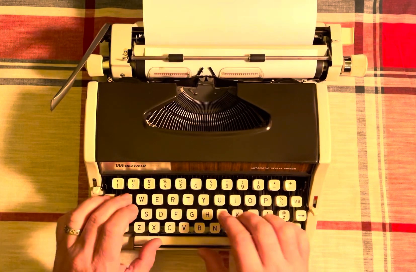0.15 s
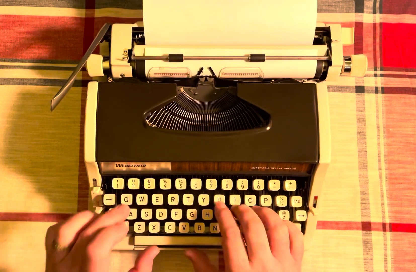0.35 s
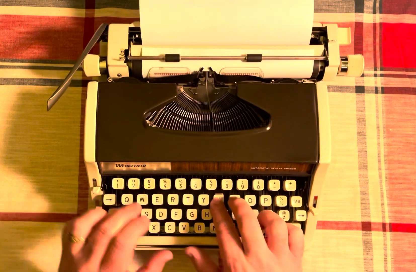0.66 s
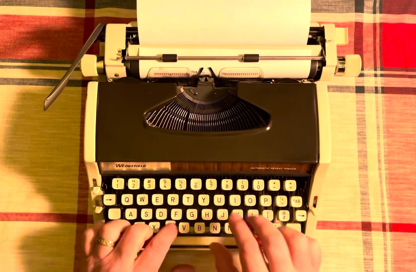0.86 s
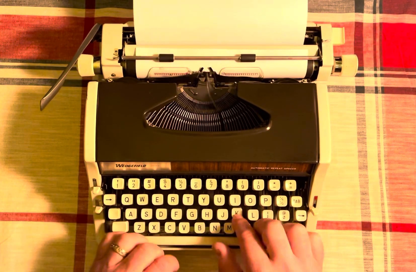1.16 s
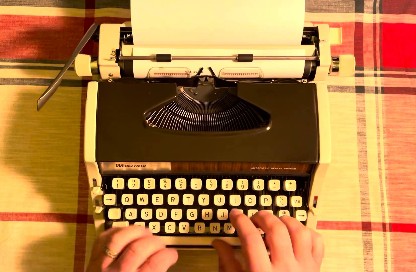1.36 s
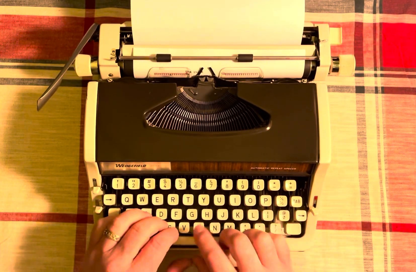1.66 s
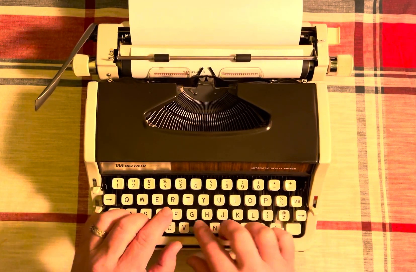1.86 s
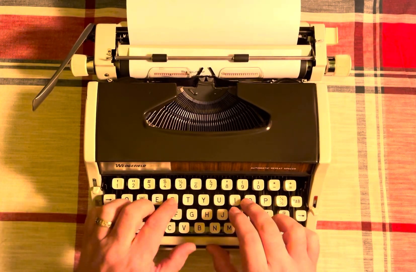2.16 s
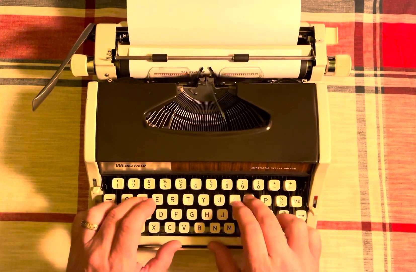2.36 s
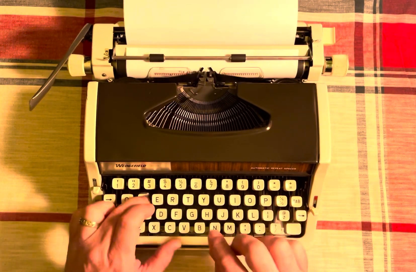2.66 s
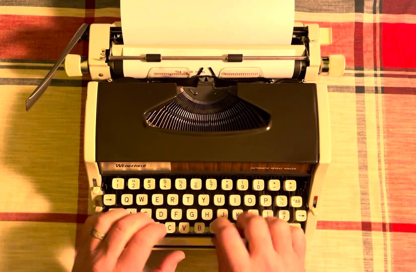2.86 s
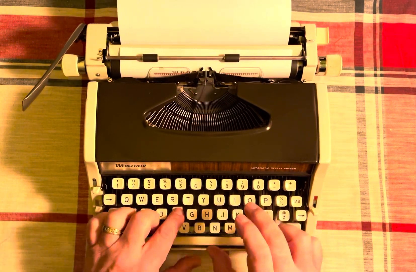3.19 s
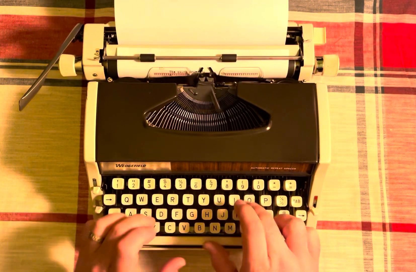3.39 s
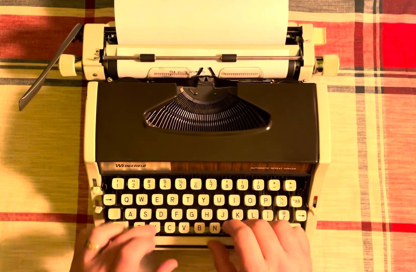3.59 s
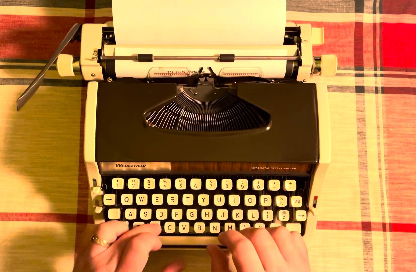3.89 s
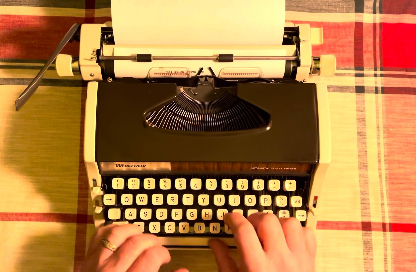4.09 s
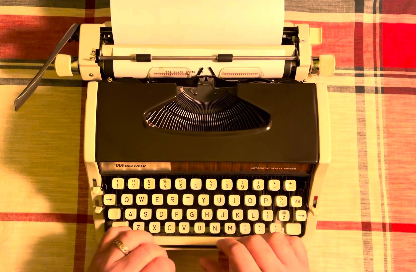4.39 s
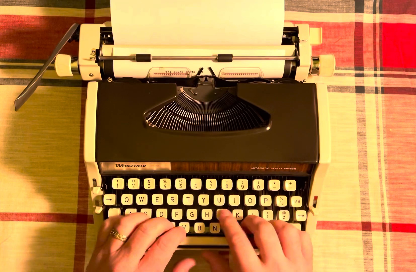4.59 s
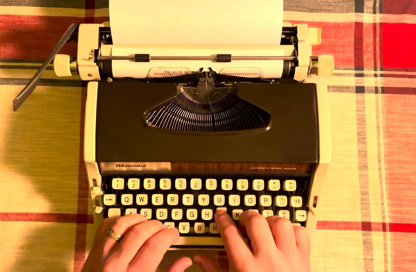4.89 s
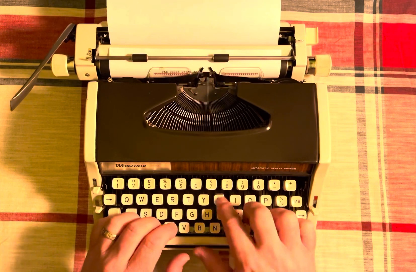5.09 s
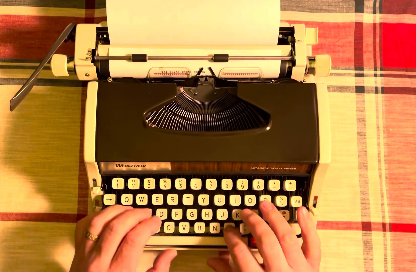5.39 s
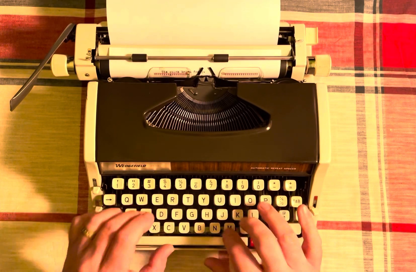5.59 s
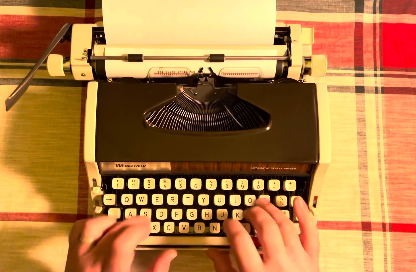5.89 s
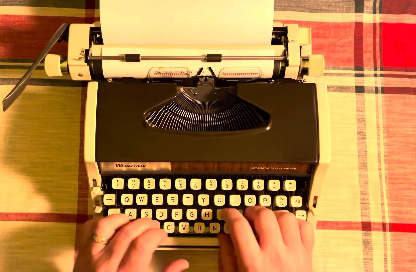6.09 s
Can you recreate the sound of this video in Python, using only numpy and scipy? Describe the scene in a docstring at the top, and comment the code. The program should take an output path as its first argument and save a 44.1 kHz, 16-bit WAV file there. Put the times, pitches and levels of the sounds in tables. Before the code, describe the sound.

A manual portable typewriter clacks in uneven bursts of sharp key strikes with softer space-bar thumps, close up in a small quiet room.

```python
"""On a cloth-covered table in a small room, a portable manual typewriter is heard by two microphone ports just above.
Each letter is a chain of metal contacts: key down, type bar on the platen, escapement step, bar falling back.
The contacts are bursts of rough force that sound directly and ring the damped modes of frame and casing.
Two low table modes sway, sixteen feedback delays form the room, and the margin bell rings faintly once.
The space bar, loose levers and a thin squeak sound in between, above a faint hush and rumble."""
import sys
import numpy as np
from scipy import signal
from scipy.fft import rfft, irfft, next_fast_len
from scipy.io import wavfile
from scipy.ndimage import uniform_filter1d

SR = 44100
rng = np.random.default_rng(int(sys.argv[2]) if len(sys.argv) > 2 else 0)


def transcribe(u):
    """Save the signal u as a 16-bit wav file named by the first command-line argument.

    u: samples, shape (n,) or (channels, n), limited to [-1, 1]; the rate is SR.
    q: integer samples, one column per channel.
    """
    v = np.clip(np.atleast_2d(u).T, -1, 1)
    q = np.round(v * 32767).astype(np.int16)
    wavfile.write(sys.argv[1], SR, q)


N = 275625

# modes of casing, frame and type bars: (frequency [Hz], relative level [dB], t60 [s])
BODY_MODES = [(190, -9.5, 0.053), (463, -10, 0.1), (542.3, -10.5, 0.085), (722.7, -9, 0.056),
              (838, -7.5, 0.056), (875, -9, 0.053), (1117, -11, 0.057), (1182.6, -8.5, 0.054),
              (1295, -8, 0.072), (2190, -10, 0.052), (2312, -10, 0.035), (2509, -5, .025),
              (2610, -6, 0.032), (3230, -6.5, .018), (3430, -8.5, 0.044), (3670, -1.5, 0.021),
              (4130, -9, 0.023), (5390, -9.5, 0.038), (5940, -11, 0.013), (7350, -10.5, 0.019),
              (11600, -7.5, 0.0077)]
# radiation and microphone response: (frequency [Hz], gain [dB])
RADIATION = [(150, -23), (350, -7), (800, 1), (1700, 0.5), (2600, 1), (4500, -1), (7000, 3), (11000, 5),
             (13000, -13), (15000, -27.5), (17000, -55.5)]


def typewriter():
    """Forced vibration: contact force radiates as clatter and excites damped modes, unevenly at each contact."""
    knock, clack, tick = force_envelopes(snap_db=-0.5, snap_s=0.00037, rise_s=[.0012, .0002, .0001])
    crack = np.minimum(clack, amp(-2.5) * np.sqrt(clack * tick))  # upper mids fade along with the tick
    clatter = amp(6.5) * band(clack * grit(1.7), 1747, 3000)
    clatter += amp(8.5) * band(crack * grit(3.1), 3000, 4740)
    clatter += amp(8.0) * band(knock * grit(2.5), 180, 1700)
    clatter += amp(4) * band(tick * grit(2.5), 4700, 21000)

    all_contacts = contacts()
    latest = np.searchsorted(all_contacts[:, 0] * SR, np.arange(N))  # the contact each sample belongs to
    strength = rng.uniform(-0.52, 1, (len(all_contacts) + 1, len(BODY_MODES)))
    shake, rings = grit(3.1), np.zeros(N)
    for k, (hz, level_db, t60) in enumerate(BODY_MODES):
        if hz < 1700:
            force = knock
        elif hz < 3000:
            force = clack
        elif hz < 4700:
            force = crack
        else:
            force = tick
        uneven = amp(3.56 * strength[latest, k])
        own_shake = np.roll(shake, 997 * k)  # shifted so that the modes do not move in step
        rings += ring(force * uneven * own_shake, hz, t60) * amp(level_db - 24)

    s, clack_db, thud_db = np.transpose(STRIKES)[:3]
    weight = amp(27) * lingering(s, clack_db + thud_db, t60=.035, rise_s=0.00045) + amp(-19) * knock
    thud = band(weight * grit(1.6), 70, 350)
    return shaped(clatter + rings, RADIATION, amp) + thud


# levers and springs keep sliding after a contact: (dull part, bright part)
SLIDE_DB, SLIDE_T60_S = (-22, -24), (.3, .2)  # dB re knock and tick
SETTLE_DB, SETTLE_T60_S = -50, 1.1  # the frame rustles on faintly: dB re knock


def force_envelopes(snap_db, snap_s, rise_s):
    """Impact and friction: each contact snaps, then chatters away, while sliding parts fill the gaps, as power."""
    rows = contacts()
    s, clack_db, knock_db, tick_db, t60, push_db = rows.T
    dull = lingering(s, clack_db + knock_db + SLIDE_DB[0], SLIDE_T60_S[0], rise_s=.004)
    dull += lingering(s, clack_db + knock_db + SETTLE_DB, SETTLE_T60_S, rise_s=.004)
    bright = lingering(s, clack_db + tick_db + SLIDE_DB[1], SLIDE_T60_S[1], rise_s=.004)
    # sliding parts catch and slip
    jerks = amp(2.5 * rms_one(uniform_filter1d(rng.standard_normal(N), size=350)))
    power = (jerks * np.array([dull, amp(-9.0) * dull, bright])) ** 2
    for s, clack_db, knock_db, tick_db, t60, push_db in rows:
        start = round(s * SR)
        age = np.arange(min(N - start, SR // 5)) / SR
        # light, bright parts rattle longer
        lasting = np.clip(t60 * amp(0.45 * np.clip(tick_db, 0, 12)), .003, .3)
        # dull, padded contacts build up slower
        padded = amp(0.64 * np.clip(-tick_db, 0, 18))
        rise = 1 - np.exp(-age / (np.abs(rise_s)[:, None] * padded + 1e-5))
        chatter = amp(-60 * age / lasting)
        snap = amp(snap_db) * np.exp(-age / snap_s)
        level = amp(clack_db + np.array([knock_db + 3.0, -4.5, tick_db - 4.5]))
        power[:, start:start + len(age)] += (level[:, None] * rise * (chatter + snap)) ** 2
    return np.sqrt(power)


def contacts():
    """Superposition: all contacts in time order, as rows of
    (time [s], clack [dB], knock [dB re clack], tick [dB re clack], base chatter t60 [s], table push [dB re clack])."""
    rows = key_downs() + strikes() + steps_and_rattles() + falls() + spaces()
    return np.array(sorted(rows))


# a finger drives a letter key down: (time [s], clack level [dB], tick [dB re clack], push on the table [dB],
# time until the lever takes the load [s], lever clack level [dB])
KEY_DOWNS = [(0.5407, -32, 13.5, -47, .0145, -24), (0.613, -32, 6, -60, .01, -45),
             (0.706, -26, 1.5, -54, .0083, -36.5), (0.86, -37, 13.5, -53, .009, -34),
             (1.1031, -29.5, 9.5, -54, .01, -44.5), (1.7575, -35.5, 7.5, -52, .0104, -41.5),
             (2.057, -33, 8.5, -43, .01, -43.5), (2.36, -34, 8.5, -46, .011, -32.5),
             (2.627, -34, 10, -55, .0103, -29.5), (3.153, -34, 10.5, -44.5, .01, -45),
             (3.3259, -32.5, 11, -55, .012, -26.5), (3.8082, -40, 12, -49, .0068, -22),
             (4.8143, -39.5, 9, -43, .0113, -42.5), (5.008, -35.5, 11, -46, .0097, -47),
             (5.602, -36.5, 3, -53, .01, -37.5), (5.806, -50, 15, -56, .01, -55),
             (5.919, -33, 7, -56, .0105, -37)]
# lever: (knock [dB re clack], tick [dB re clack], base chatter t60 [s], push [dB re clack])
KEY_KNOCK_DB, KEY_T60_S, LEVER = -1, .035, (-3, 3, 0, -35)


def key_downs():
    """Load transfer: the key moves first, then its lever takes up the load with a second contact."""
    rows = []
    for s, db, tick_db, push_db, lever_s, lever_db in KEY_DOWNS:
        rows.append((s, db, KEY_KNOCK_DB, tick_db, KEY_T60_S, push_db - db))
        rows.append((s + lever_s, lever_db, *LEVER))
    return rows


# type bar on the platen: (time [s], clack level [dB], low thud [dB re clack],
# graze on the guide just before [dB], rebound [dB])
STRIKES = [(0.5797, -10, -40, -26, -44), (0.6304, -11.5, -45, -29, -30), (0.7312, -11, -43, -34.5, -28.5),
           (0.9038, -11, -41.5, -16.5, -28), (1.1334, -11, -44, -19, -27), (1.7981, -10.5, -42, -18.5, -39),
           (2.0906, -9, -43, -24.5, -30), (2.4, -7.5, -34, -23, -23), (2.6694, -10.5, -44.5, -28, -28),
           (2.7875, -8.5, -42.5, -24.5, -31.5), (3.1878, -7.5, -36.5, -21, -25),
           (3.3591, -9, -46, -18.5, -27), (3.8448, -10, -38, -24, -34.5), (4.85, -9, -43, -23.5, -32),
           (5.0436, -7, -40, -25, -29), (5.6407, -8.5, -42, -21.5, -37), (5.8327, -7.5, -46, -27, -40),
           (5.952, -8.5, -48, -24, -32)]
# each: (knock [dB re clack], tick [dB re clack], base chatter t60 [s], push on the table [dB re clack])
GUIDE, PLATEN, REBOUND = (-7, 2, .025, -45), (-13, 1.3, 0.027, -50), (-7, 7, 0.02, -40)
GUIDE_BEFORE_S, REBOUND_AFTER_S = .0055, .015


def strikes():
    """Impact and rebound: the type bar grazes its guide, hits the platen and springs back."""
    rows = []
    for s, db, thud_db, guide_db, rebound_db in STRIKES:
        rows.append((s - GUIDE_BEFORE_S, guide_db, *GUIDE))
        rows.append((s, db, *PLATEN))
        rows.append((s + REBOUND_AFTER_S, rebound_db, *REBOUND))
    return rows


# escapement lets the carriage step: (time [s], clack level [dB], casing knock [dB re clack], tick [dB re clack])
STEPS = [(0.7769, -25, -6, 1.5), (0.9691, -23, -26, 2.5), (1.2013, -27, -17, 5.5), (1.851, -37, 5, 0.5),
         (2.1402, -28.5, -6.5, 0.5), (2.4526, -32, 0, 3), (2.723, -26.5, -3.5, -3), (2.8555, -33, -5, -1.5),
         (3.2489, -24, -16, -4), (3.4121, -27.5, -12, -0.5), (3.895, -34, 0, 3.5), (4.9104, -31, -1.5, 1),
         (5.0934, -26, -10, -2.5), (5.696, -25.5, -5, -5), (5.866, -13.5, -15, -5.5), (5.996, -22.5, -5, 2)]
# loose levers and fingers brushing keys: (time [s], clack level [dB], casing knock [dB re clack],
# tick [dB re clack])
RATTLES = [(0.184, -41.5, 1, 3.5), (0.2376, -62, 8, 16), (0.2425, -46.5, 3, -0.5), (0.2904, -48.5, 6, -0.5),
           (0.339, -56.5, 5.5, -8), (0.547, -28, -5.5, 5), (0.652, -31, -7, 5), (0.759, -34, -3, 2),
           (1.585, -54.5, 2.5, -1.5), (1.642, -51, 7.5, -4), (1.7743, -40.5, -3, 11.5),
           (2.219, -52.5, 6, 10), (2.347, -48.5, -1, -11), (2.674, -25, -12, -2), (2.6908, -28, -7, 5),
           (2.7037, -30, 1.5, 4.5), (2.968, -45, -11, -1), (3.085, -43.5, 2, -4.5), (3.332, -32.5, -2.5, 6),
           (3.4767, -44.5, 7.5, -6), (3.554, -42, -4.5, 1), (3.822, -31, -3, -3), (3.961, -47.5, 12, -3),
           (4.1264, -47, -6, 2), (4.5387, -57, -13.5, 7), (4.5654, -60.5, 2, 0), (4.6083, -66, 4.5, 4),
           (4.644, -72, 5.5, 9), (4.6798, -55, 6, -6.5), (4.711, -55, 1, -6), (5.161, -50.5, -7, 12.5),
           (5.2563, -53, 12, -9), (5.2922, -47.5, 1.5, -2), (5.3233, -58, -1, 4), (5.332, -49, -6, -4),
           (5.356, -55, 6, -21), (5.3997, -46.5, 0.5, 6.5), (5.4563, -49, -3.5, -3.5),
           (5.4903, -55.5, 4, -21), (5.5359, -64.5, 9, -14), (5.621, -44, 0.5, 12), (5.6716, -38.5, -8, 3),
           (5.7797, -39.5, 0, 10), (5.8575, -33, -15, 6), (5.882, -34, 2, -12), (5.975, -33, -1, 12.5),
           (5.983, -43.5, 4, 22), (6.0631, -33, 4.5, 11.5), (6.2286, -58, -9, 8)]
RATTLE_T60_S, RATTLE_PUSH_DB = .032, -30  # base chatter; push in dB re clack


def steps_and_rattles():
    """Light impact: escapement steps and loose parts share one short chatter time."""
    return [(s, db, knock_db, tick_db, RATTLE_T60_S, RATTLE_PUSH_DB)
            for s, db, knock_db, tick_db in STEPS + RATTLES]


# type bar drops back on its rail: (time [s], clack level [dB], tick [dB re clack],
# time to the bounce [s], bounce level [dB])
FALLS = [(0.6803, -33.5, -13.5, .045, -54.5), (0.8195, -19.5, -8.5, .045, -57),
         (1.0156, -23, -6.5, .041, -37), (1.2338, -23, -9, .045, -54), (1.8872, -20, -9, .0434, -35),
         (2.1838, -26.5, -4.5, .0674, -40.5), (2.498, -18.5, -14.5, .052, -47.5),
         (2.7525, -23.5, 1, .045, -54), (2.8839, -18, -11.5, .0468, -32.5),
         (3.288, -21.5, -16, .045, -54.5), (3.4555, -22.5, -7.5, .0483, -41),
         (3.9378, -25, -8.5, .045, -53), (4.9426, -19, -12, .0583, -33), (5.1316, -19.5, -13.5, .0515, -35),
         (5.7361, -19, -18, .0564, -33), (5.91, -15, -6, .045, -55), (6.0475, -26.5, -5.5, .045, -55)]
# contacts that come with a fall: (time after it [s], level [dB re it], knock [dB re clack],
# tick [dB re clack], base chatter t60 [s], push [dB re clack])
FALL_PARTS = [(-.007, -27, 6, 9.5, .03, -29), (.006, -10.5, 2, -6, 0.026, -30)]
FALL_KNOCK_DB, FALL_T60_S, FALL_PUSH_DB = -4.5, .032, -35
# bounce: (knock [dB re clack], tick [dB re clack], base chatter t60 [s], push [dB re clack])
BOUNCE, SECOND_BOUNCE_DB = (3.5, -11, 0.02, -30), -16  # second bounce in dB re the first


def falls():
    """Inelastic bouncing: the bar lands and bounces twice, weaker the second time, amid lesser contacts."""
    rows = []
    for s, db, tick_db, hop_s, bounce_db in FALLS:
        rows.append((s, db, FALL_KNOCK_DB, tick_db, FALL_T60_S, FALL_PUSH_DB))
        rows.append((s + hop_s, bounce_db, *BOUNCE))
        rows.append((s + 2 * hop_s, bounce_db + SECOND_BOUNCE_DB, *BOUNCE))
        rows += [(s + after_s, db + part_db, *colour) for after_s, part_db, *colour in FALL_PARTS]
    return rows


# thumb on the space bar: (pressed at [s], clack level [dB], released at [s], clack level [dB])
SPACES = [(0.0082, -21, 0.0926, -20), (1.2964, -21.5, 1.386, -21), (2.9058, -32, 2.9877, -21),
          (4.0517, -20.5, 4.143, -22), (6.0929, -25.5, 6.1548, -22.5)]
# contacts within a press and a release: (time after it [s], level [dB re it], knock [dB re clack],
# tick [dB re clack], base chatter t60 [s], push [dB re clack])
SPACE_DOWN = [(-.013, -10, -0.5, 3.7, .06, -30), (0, 0, -3.5, 0.79, 0.034, -25),
              (.013, -7, -8, 2.7, .03, -30)]
SPACE_UP = [(-.011, -16.5, -3.5, 4, 0.05, -28.5), (0, -0.5, -0.6, 0.5, .04, -21),
            (.025, -19, 9, 1.5, .04, -32.5)]


def spaces():
    """Successive impact: each press and each release of the bar is three contacts."""
    rows = []
    for down_s, down_db, up_s, up_db in SPACES:
        for s, db, parts in ((down_s, down_db, SPACE_DOWN), (up_s, up_db, SPACE_UP)):
            rows += [(max(s + after_s, 0), db + part_db, *colour) for after_s, part_db, *colour in parts]
    return rows


# modes of the rail the bars fall back on: (frequency [Hz], relative level [dB], t60 [s])
RAIL_MODES = [(2443, -1, 0.051), (2290, -6.5, 0.017)]


def rail():
    """Modal response: the duller a contact's tick, the more it is a bar on the padded rail, which tinks."""
    s, clack_db, knock_db, tick_db, t60, push_db = contacts().T
    share = np.clip((-tick_db - 2.5) / 6, 0, 1)
    drops = np.zeros(N)
    drops[(s * SR).astype(int)] = share * amp(clack_db - 1.5)
    return sum(ring(drops, hz, t60) * amp(level_db) for hz, level_db, t60 in RAIL_MODES)


BELL_S, BELL_HZ, BELL_DB, BELL_T60_S = 2.4, 5950, -68, 3.2  # margin bell, barely touched by its hammer


def bell():
    """Free vibration: one click leaves a single thin partial fading for seconds."""
    hammer = np.zeros(N)
    hammer[round(BELL_S * SR)] = amp(BELL_DB)
    return ring(hammer, BELL_HZ, BELL_T60_S)


SQUEAK_S, SQUEAK_LASTS_S, SQUEAK_HZ, SQUEAK_WIDTH_HZ, SQUEAK_DB = 4.39, .17, 2750, 100, -83


def squeak():
    """Narrow-band noise: a faint thin squeak swells and fades."""
    age = np.clip((np.arange(N) / SR - SQUEAK_S) / SQUEAK_LASTS_S, 0, 1)
    thin = band(rng.standard_normal(N), SQUEAK_HZ - SQUEAK_WIDTH_HZ / 2, SQUEAK_HZ + SQUEAK_WIDTH_HZ / 2)
    swell = np.sqrt(np.abs(np.sin(np.pi * age)))
    return amp(SQUEAK_DB) * swell * rms_one(thin)


ROOM_T60_S, WALL_CUT_HZ, ROOM_DB = 0.22, 13000, -19  # t60 at low pitch


def room(x):
    """Reverberation: eight feedback delays a side, duller on every round, summed on a frequency grid."""
    size = next_fast_len(N + SR)
    turn = -2j * np.pi * np.arange(size // 2 + 1) / size  # phase of a one-sample delay
    dull = np.exp(-2 * np.pi * WALL_CUT_HZ / SR)
    wall = (1 - dull) / (1 - dull * np.exp(turn))
    response = np.zeros((2, len(turn)), complex)
    for k, lag in enumerate((np.geomspace(.0071, .0313, 16) * SR).astype(int)):
        loop = amp(-60 * lag / SR / ROOM_T60_S) * wall * np.exp(turn * lag)
        response[k % 2] += loop / (1 - loop) * (-1) ** (k // 2)
    return irfft(rfft(x, size) * response, size)[:, :N]


# level of the table top's lower mode: (time [s], level [dB])
TABLE_LEVEL = [(0.0, -57), (0.14, -48.5), (0.36, -61), (1.51, -55), (1.56, -69.5), (1.72, -54), (2.0, -65),
               (2.4, -50.5), (2.58, -67), (2.65, -53.5), (3.67, -62), (4.38, -55.5), (4.46, -63),
               (5.5, -54), (5.59, -70), (5.64, -52.5), (6.08, -50.5), (6.25, -58)]
TABLE_HZ = (58.6, 113.6)  # lower and upper mode
SWAY_RISE_S, SWAY_T60_S, SWAY_REST_DB = .025, .55, -77  # the upper mode is pushed by the contacts
# spectrum of the room's hush: (frequency [Hz], relative level [dB])
HUSH_SPECTRUM = [(88, -34), (150, -0.5), (411, -6.5), (681, -17.5), (2380, -29.5), (2710, -30),
                 (4830, -34.5), (13000, -30.5)]
HUSH_DB = -77


def background():
    """Random excitation: low table modes swell and waver under uneven shaking; the room adds hush and rumble."""
    hush = rms_one(shaped(rng.standard_normal(N), HUSH_SPECTRUM, amp)) * amp(HUSH_DB)
    rumble = rms_one(band(rng.standard_normal(N), 30, 110)) * amp(-76.5)
    out = hush + rumble
    s, clack_db, knock_db, tick_db, t60, push_db = contacts().T
    lower = amp(in_time(TABLE_LEVEL)[0])
    upper = amp(SWAY_REST_DB) + lingering(s, clack_db + push_db, SWAY_T60_S, SWAY_RISE_S)
    for hz, level in zip(TABLE_HZ, (lower, upper)):
        shaken = rms_one(band(rng.standard_normal(N), .915 * hz, 1.085 * hz))
        swell = np.sqrt(uniform_filter1d(shaken ** 2, size=3000) + 0.039)
        out += level * shaken / swell  # how hard it sways is evened out
    return out


# microphone ports: (frequency [Hz], phase by which the left port leads [rad])
PORT_LEAD = [(0, 0), (300, -.03), (900, -.12), (1600, 0), (2750, .7), (3800, .6), (4500, 1.7), (5170, 4.75),
             (5850, 6.2), (8600, 9.3), (9300, 9.5), (12400, 12.55), (13800, 12.66), (14800, 15),
             (16200, 15.7)]


def ports(x):
    """Interaural-style phase difference: two ports hear one sound, with a lead that varies with pitch."""
    return np.array([shaped(x, PORT_LEAD, lambda lead: np.exp(.5j * side * lead)) for side in (1, -1)])


def amp(db):
    """Logarithmic level: decibels to gain."""
    return 10 ** (np.asarray(db) / 20)


def rms_one(x):
    """Mean power: scale to rms 1."""
    return x / np.sqrt(np.mean(x ** 2) + 1e-20)


def in_time(rows):
    """Linear interpolation: the columns of a curve, one value per sample."""
    s, *columns = np.transpose(rows)
    return [np.interp(np.arange(N) / SR, s, c) for c in columns]


def shaped(x, points, law):
    """Linear filtering: multiply the spectrum by law(value), the value read from (Hz, value) points."""
    size = next_fast_len(N + 4096)
    hz, value = np.transpose(points)
    grid_hz = np.arange(size // 2 + 1) * SR / size
    at = np.interp(np.log(grid_hz + 1), np.log(hz + 1), value)
    return irfft(rfft(x, size) * law(at), size)[..., :N]


def band(x, low_hz, high_hz):
    """Causal filtering: a band-pass."""
    return signal.sosfilt(signal.butter(2, [low_hz, high_hz], "band", fs=SR, output="sos"), x)


def ring(force, hz, t60):
    """Damped resonance: a unit click sets a sine of height 1 ringing."""
    r, w = amp(-60 / (max(t60, .004) * SR)), 2 * np.pi * hz / SR
    return signal.lfilter([0, np.sin(w)], [1, -2 * r * np.cos(w), r * r], force + 1e-18)


def grit(spread_db):
    """Random impacts: uneven ones on every sample, a few much larger, coming in clumps; rms 1."""
    clumps = rms_one(uniform_filter1d(rng.standard_normal(N), size=60))
    sizes = spread_db * np.minimum(rng.exponential(1, N), 5)
    return rms_one(amp(sizes + 2.97 * clumps) * rng.choice([-1, 1], N))


def lingering(s, level_db, t60, rise_s):
    """Energy decay: each event adds power that builds up, then dies away; returned as gain."""
    power = np.full(N, 1e-18)
    np.add.at(power, (s * SR).astype(int), amp(level_db) ** 2)
    fall, rise = amp(-120 / (t60 * SR)), np.exp(-1 / (rise_s * SR))  # -120 because this is power
    decaying = signal.lfilter([1], [1, -fall], power)
    return np.sqrt(signal.lfilter([1 - rise], [1, -rise], decaying))


def scene():
    """Superposition: machine, bell, squeak and background through the ports, the room's answer partly shared."""
    machine = typewriter() + rail()
    first, second = room(machine) * amp(ROOM_DB)
    unalike = amp(-4) * band(second, 450, 15000) * [[1], [-1]]  # opposite sign at the two ports
    # a bounce off the table arrives from another side and reaches both ports together
    bounce = amp(-11) * band(np.roll(machine + first, 40), 4490, 5380)
    return ports(machine + bell() + squeak() + first + background()) + unalike + bounce


STOP_EDGE_HZ = 16400  # 70 dB down from here up


def record(dry):
    """Saturation and low-pass filtering: peaks are rounded, then the top is cut steeply."""
    rounded = np.tanh(dry / .95) * .95
    return signal.sosfilt(signal.cheby2(12, 70, STOP_EDGE_HZ, fs=SR, output="sos"), rounded)


dry = scene()
out = record(dry)
transcribe(out)
```